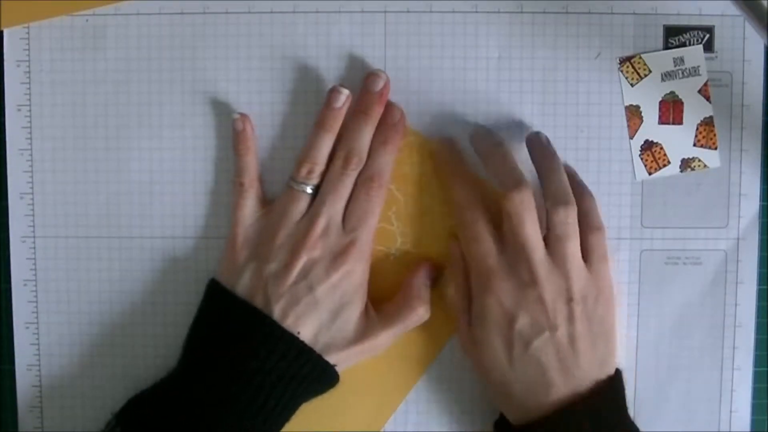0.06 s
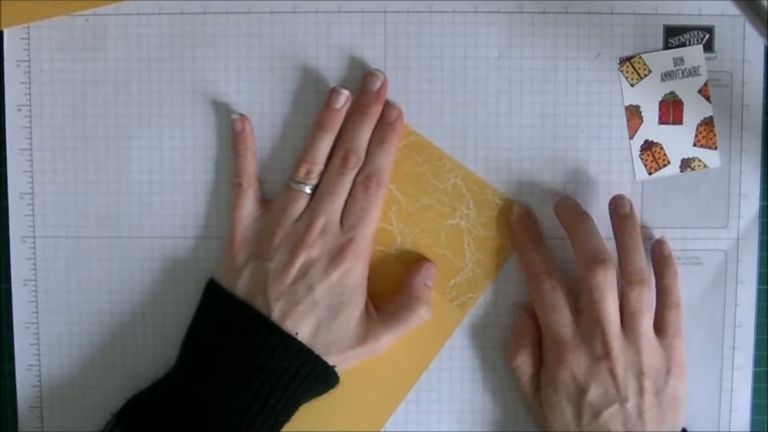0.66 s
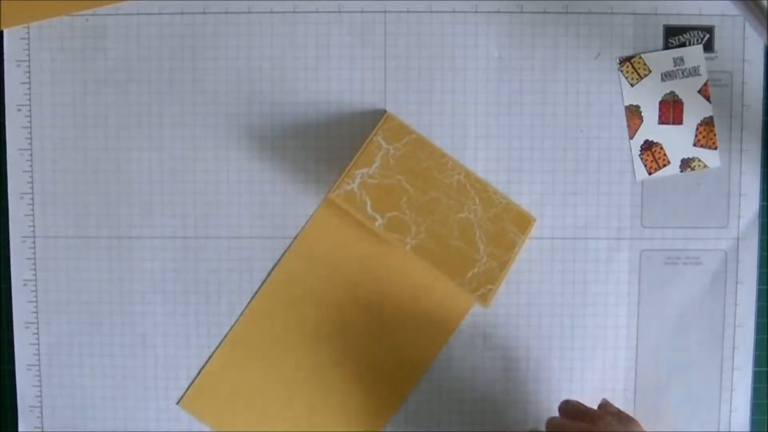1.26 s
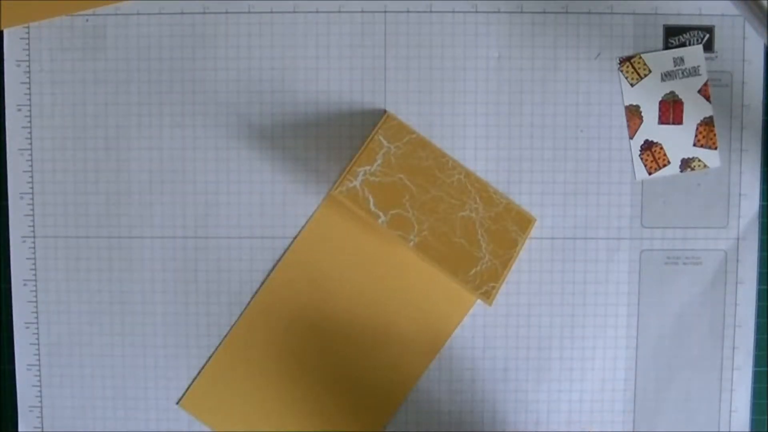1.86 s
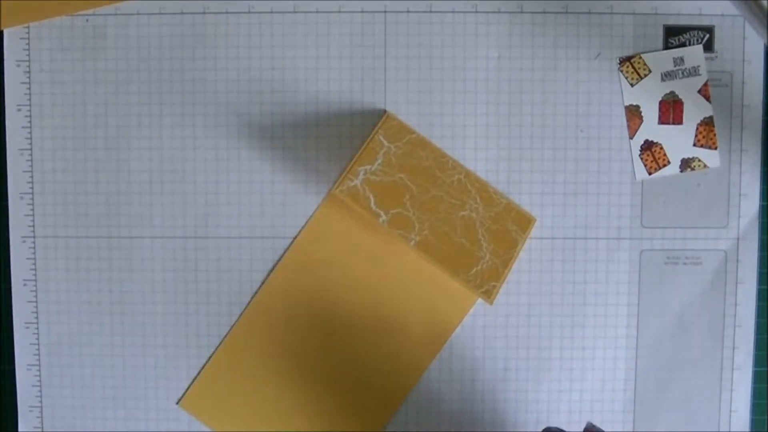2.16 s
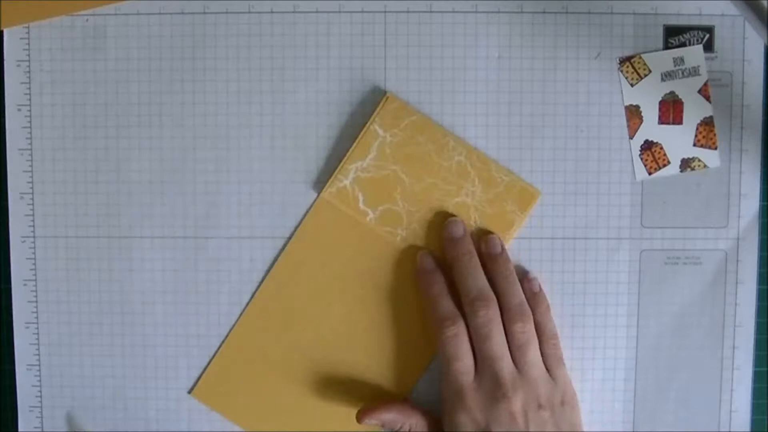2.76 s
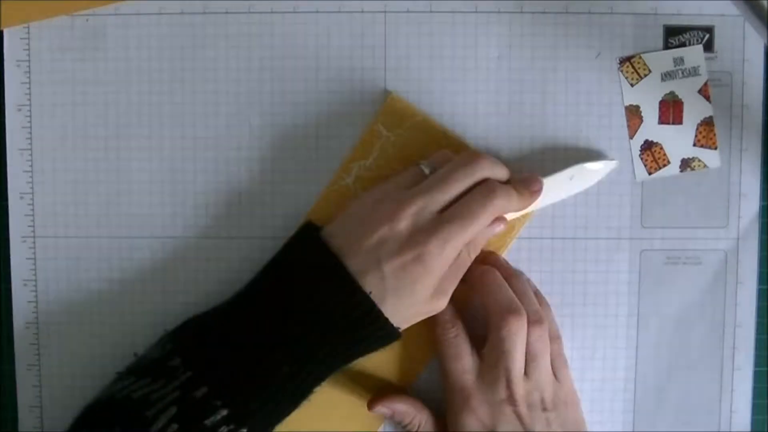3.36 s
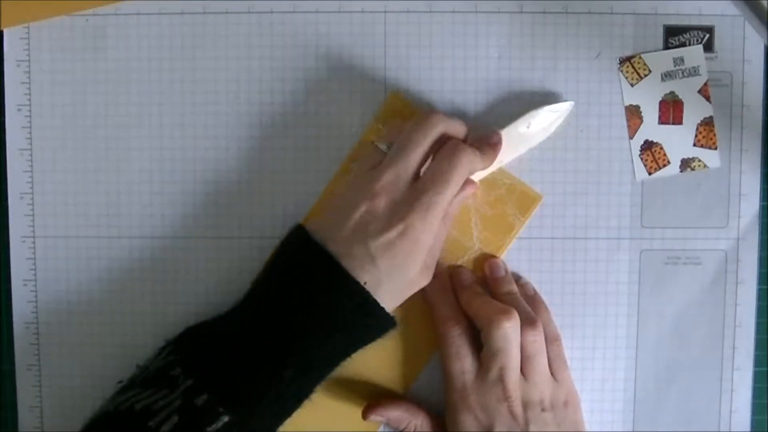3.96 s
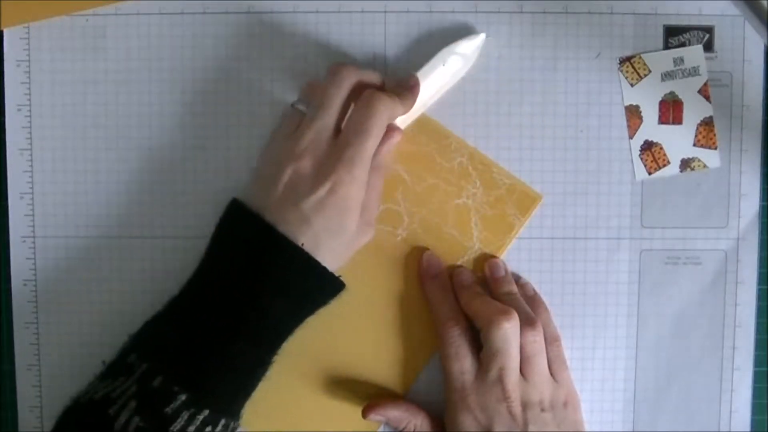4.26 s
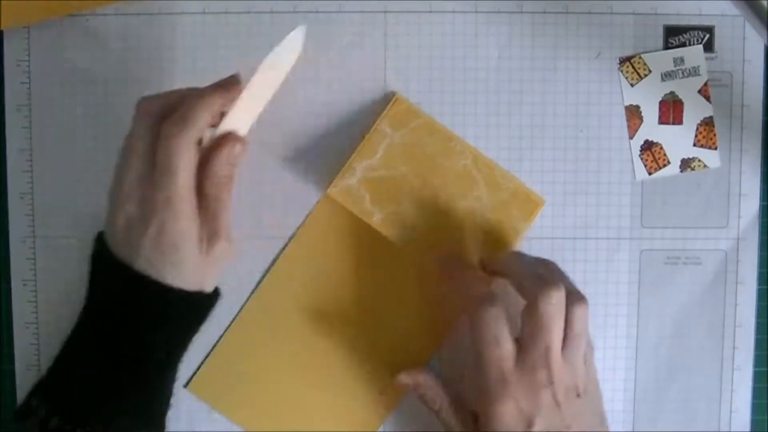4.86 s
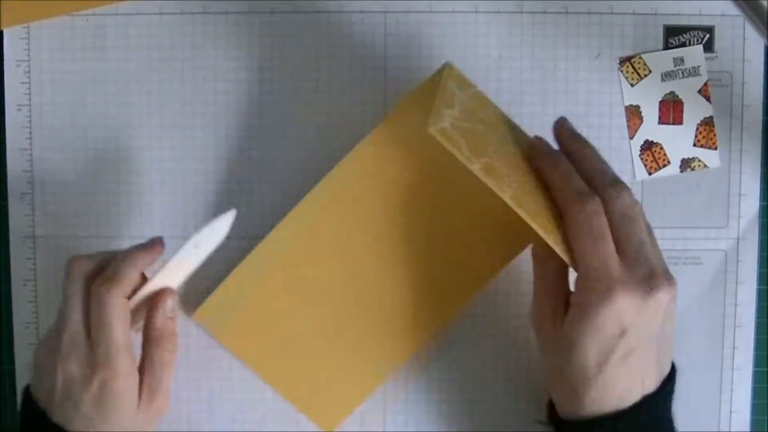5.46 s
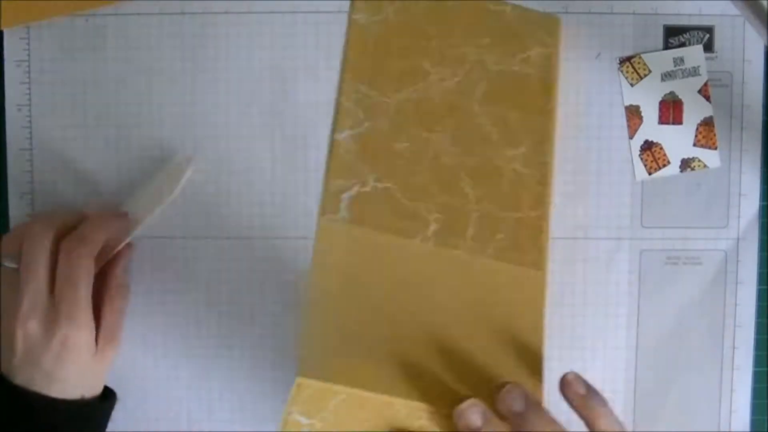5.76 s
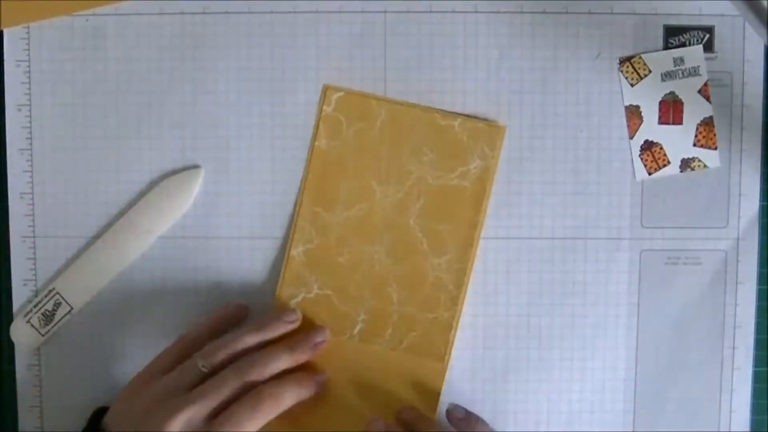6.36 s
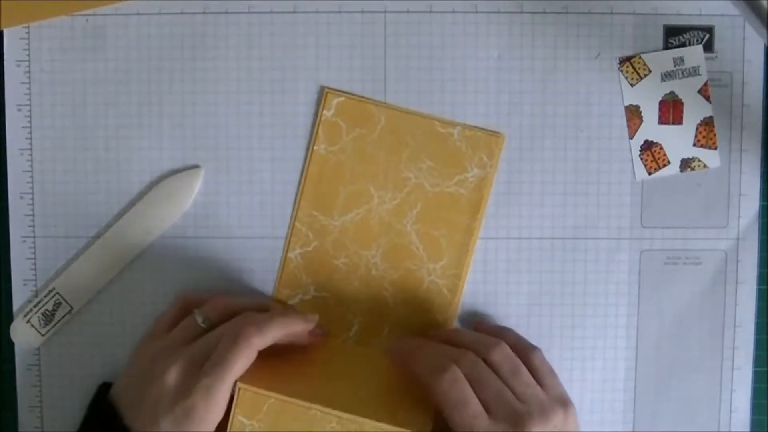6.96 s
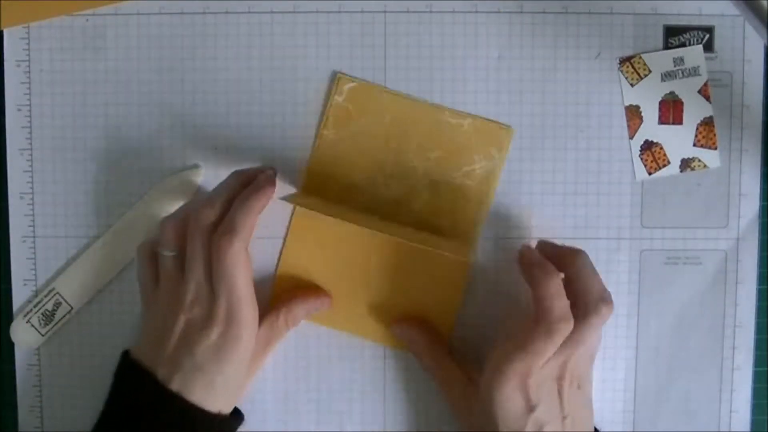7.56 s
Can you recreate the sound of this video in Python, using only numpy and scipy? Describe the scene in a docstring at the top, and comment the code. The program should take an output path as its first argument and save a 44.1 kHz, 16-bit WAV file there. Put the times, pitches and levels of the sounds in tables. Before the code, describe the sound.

Fingers slide over cardstock with a soft, dry hiss and one light tap during the first second. Around 1.5 seconds the card snaps and a hard bone folder knocks sharply with a short ring, knocking again near 1.9. Brief scuffs follow at 2.5, another knock at 3 and a snap with a soft table thump at 3.3. From about 3.5 to 4.6 the folder rubs along the crease, swelling near 4 and ending in a small snap and thump. The card swishes as it is turned, snapping at 5.7, and the tool lands with a loud clack and low thud just before 6. More sliding and edge scuffs lead to a cluster of crisp snaps and soft thumps around 7.3 to 7.5 as the card is folded again. Everything sounds close, with slight small-room reverberation over faint steady air.

```python
"""Cardstock is folded by hand on a paper-covered craft mat in a small room.
Fingers slide on the card with a friction hiss, its edges scuff, and its flap springs up with a snap.
A bone folder knocks as it is picked up, rubs along the crease and is put down; the card is turned
over and folded again. Presses ring the table's low modes as soft thumps, over steady room air."""
import sys
import numpy as np
from scipy import signal
from scipy.fft import rfft, irfft, next_fast_len
from scipy.io import wavfile
from scipy.ndimage import map_coordinates

SR = 44100
rng = np.random.default_rng(int(sys.argv[2]) if len(sys.argv) > 2 else 0)


def transcribe(signal):
    """Save signal, clipped to [-1, 1], as a 16-bit WAV file at the path in sys.argv[1]."""
    frames = np.atleast_2d(signal).T
    limited = np.clip(frames, -1, 1)
    pcm = np.round(limited * 32767).astype(np.int16)
    wavfile.write(sys.argv[1], SR, pcm)


N = 335160

# card and finger moves: peak_s, rise_s, fall_s, level_db, body_re_level_db, fizz_re_level_db, pocket_hz
CARD_SLIDES = [(0, 0.13, 0.215, -51, -15.5, -6.5, 740), (0.478, .18, 0.17, -52.5, -6.5, -2, 1000),
               (.795, 0.135, 0.11, -56.5, -11, -7.5, 1300), (1.05, 0.38, 0.17, -63.5, -15, -16, 1200),
               (1.28, 0.08, 0.033, -61, -22, -10, 1180), (2.51, 0.014, 0.08, -46.5, -15.5, -2, 1280),
               (2.62, 0.012, 0.05, -51.5, -16, -9, 1000), (3.245, 0.0071, 0.092, -50.5, -13, -12.5, 1200),
               (3.495, 0.044, 0.062, -57.5, -20, -17, 1200), (4.719, 0.035, 0.09, -50.5, -10.5, -7.5, 1790),
               (4.99, 0.27, 0.2, -58.5, -12, -24, 1200), (5.4, 0.055, 0.16, -52.5, -18, 0, 1390),
               (5.57, 0.096, 0.07, -55.5, -17, 1, 1410), (5.9, 0.3, 0.29, -58.5, -12, -8.5, 1210),
               (6.12, 0.057, 0.035, -53, -22, -12, 1600), (6.32, 0.17, 0.057, -51.5, -15, -7.5, 1408),
               (6.445, 0.081, 0.029, -50, -17, -10.5, 1210), (6.61, 0.045, 0.08, -52.5, -13, -17, 1350),
               (6.775, 0.14, 0.055, -45.5, -10, -17, 1350), (6.88, 0.044, 0.27, -59, -8, -12, 1260),
               (7.08, 0.025, 0.4, -51, -6, -5.5, 1300), (7.36, 0.15, 0.16, -51.5, -13.5, -10.5, 1360),
               (7.6, 0.069, .1, -52, -17, -5, 1200)]
# edge catches: centre_s, hiss_db, sigma_s, tone_db, tone_hz
EDGE_SCUFFS = [(0.81, -55, 0.013, -66, 4100), (1.3, -77, 0.0036, -59.5, 3200),
               (1.618, -44, 0.0044, -45.5, 3380), (1.666, -53, 0.0068, -53, 4600),
               (1.706, -42.5, 0.014, -52, 1870), (1.865, -83, 0.014, -56.5, 1120),
               (2.552, -55, 0.0041, -44, 4800), (3.278, -55, 0.007, -57, 1260),
               (4.714, -49, 0.0073, -51.5, 2230), (4.838, -53, 0.0092, -74, 4420),
               (5.432, -45, 0.0034, -52, 4500), (6.684, -45, 0.0046, -49, 2870),
               (6.761, -42, .003, -48.5, 1410), (7.203, -48, 0.011, -52.5, 1230),
               (7.271, -51, 0.0075, -46, 7850), (7.299, -46, 0.0053, -45.5, 1250),
               (7.326, -50, 0.0054, -45, 1450), (7.382, -41, 0.0049, -47, 1270),
               (7.418, -41.5, 0.0044, -42.5, 4070)]
# card snaps: start_s, level_db, low_knock_db, high_crack_db, after_ring_db, resonance_hz
CARD_SNAPS = [(1.487, -38, -23, -14, 5.5, 2060), (1.493, -30, -28, -11, -3, 3580),
              (1.603, -32, -0.5, -33, 0.5, 1460), (2.613, -35, -23, -24, -9, 3350),
              (2.860, -40.5, -29, -5.5, -3, 7800), (3.335, -38, -11.5, -5.5, 1.5, 8360),
              (4.604, -35.5, -8, -7.5, 0, 816), (5.172, -42, -13.5, -6.5, 7, 8000),
              (5.254, -36.5, -20, -9.5, 2.5, 4160), (5.7445, -26, -11.5, -1.5, -9, 4720),
              (6.355, -38.5, -1.5, -19, -5.5, 1260), (6.416, -33, -6, -23, -14, 1070),
              (7.319, -23.5, -17, -12, 4, 1400), (7.419, -23, -20, -10, -3.5, 4380),
              (7.451, -28, -14, -5.5, -14, 8270)]
# resonances of the card on the mat: centre_hz, width_hz, gain_db
CARD_MODES = [(3044, 81, 4.5), (3930, 115, 0), (4300, 72, -5), (5530, 64, 6), (7820, 99, -9)]
# folder stroke along the crease: time_s, friction_db
FOLDER_STROKE = [(3.55, -64.5), (3.612, -51), (3.682, -58), (3.824, -51), (3.946, -53.5), (4.004, -44.5),
                 (4.162, -43), (4.25, -54.5), (4.396, -51.5), (4.47, -59.5), (4.504, -72), (4.57, -55)]
# folder knocks: the columns of CARD_SNAPS, then favoured_mode_hz, modes_re_level_db
FOLDER_KNOCKS = [(1.5586, -14, -20, -17, -3.5, 4420, 5500, -31),
                 (1.877, -22.5, -12.5, -20, -0.5, 2480, 2440, -25),
                 (3.0128, -26, -13, 2, -7, 1800, 7900, -28), (5.947, -12, -16, -11, -6.5, 4500, 1700, -42)]
# modes of the folder and of a fingertip tap: pitch_hz, level_db
FOLDER_MODES = [(1700, -2), (2440, -4), (3355, -2), (4430, -17), (5500, -1.5), (7900, -1.5), (10700, -14)]
TAP_MODES = [(1437, -46), (2046, -47), (2620, -45), (2900, -43.5), (3600, -47)]
# presses and blows on the table, after a low bump at the very start: start_s, peak_db, push_centre_hz
TABLE_THUMPS = [(.002, -56.5, 85), (1.605, -58, 402), (1.882, -58.5, 222), (2.51, -56, 144),
                (2.653, -56.5, 84), (3.346, -41.5, 152), (4.604, -42.5, 340), (5.621, -53, 78.5),
                (5.754, -36.5, 200), (5.938, -39.5, 107), (5.949, -38.5, 610), (7.289, -55, 120),
                (7.421, -51, 125), (7.456, -44.5, 177)]
# table top modes: pitch_hz, level_db, t60_s
TABLE_MODES = [(79, -1, 0.23), (100, -4, 0.07), (119.6, -1.5, 0.19), (165, -5, 0.12), (248, 2, 0.072),
               (312, -0.5, 0.048), (489.5, -10, 0.083), (770, -7, 0.05)]
# spectra of card friction, folder friction, impacts and room air: freq_hz, gain_db
RUB_SPECTRUM = [(120, -51), (300, -7), (620, -15), (880, -3), (1280, -5.5), (1950, -2), (3000, -1.5),
                (4600, 5.5), (5500, -2), (6400, -8.5), (8200, -5.5), (9800, -19), (15800, -26)]
CREASE_SPECTRUM = [(100, -14), (250, -7), (550, -12.5), (900, -4.5), (2600, -4.5), (4600, 2.5), (5500, -4),
                   (6300, -12.5), (7900, -1.5), (9600, -16.5), (15800, -23.5)]
IMPACT_SPECTRUM = [(70, -60), (220, -19.5), (750, -9), (1700, -1), (2500, -1), (3500, 2.5), (4700, 4),
                   (6400, -5.5), (7400, 0), (7850, 1.5), (8600, -1), (10000, -14), (15800, -16)]
AIR_SPECTRUM = [(25, -10.5), (100, -3.5), (260, 0.5), (800, -6), (1900, -9), (4300, -10), (8000, -13.5),
                (15800, -20.5)]
# room decay: freq_hz, t60_s
ROOM_DECAY = [(100, 0.51), (2500, 0.42), (8000, 0.27), (15000, 0.14)]
# left-right likeness of friction, room tail and room air: freq_hz, correlation
RUB_CORRELATION = [(60, 0.91), (300, 0.39), (1200, 0.89), (3000, 0.97)]
TAIL_CORRELATION = [(100, 1), (300, -0.84), (900, 0.88)]
AIR_CORRELATION = [(300, -0.61), (1650, -0.37), (5000, 0.71), (15000, 1)]

SCENE_S, HIT_S = np.arange(N) / SR, np.arange(SR // 2) / SR  # time axes


def card_slides(pocket_width_hz=1700, comb_db=4.5, comb_fade_hz=4200):
    """Flat card rubs with a hollow body, tuned by the air pocket under it; a lifted edge fizzes."""
    rub = friction(RUB_SPECTRUM, catches_per_s=450, catch_db=-8, ring_db=-8, judder_db=1.43)
    body, hiss, fizz = map(unit_rms, split(rub, 1800, 9130))
    out = np.zeros((2, N))
    for peak_s, rise_s, fall_s, level_db, body_db, fizz_db, pocket_hz in CARD_SLIDES:
        envelope = amp(level_db) * swell(peak_s, rise_s, fall_s)
        on = envelope > 0
        pocket = lambda hz: 1 + amp(0.5) * resonance(hz, pocket_hz, pocket_width_hz)
        hollow = unit_rms(filtered(body[:, on], pocket))
        tilt_db_per_oct = 0.06 * (fizz_db + 9)  # a lighter touch hisses thinner
        tilt = lambda hz: amp(tilt_db_per_oct * np.log2(hz / pocket_hz + 1))
        thinned = unit_rms(filtered(hiss[:, on], tilt))
        slide = thinned + amp(body_db) * hollow + amp(fizz_db) * fizz[:, on]
        overtones = lambda hz: np.cos(2 * np.pi * (hz / pocket_hz - 0.1))
        comb = lambda hz: amp(comb_db * amp(body_db) * overtones(hz) * np.exp(-(hz / comb_fade_hz) ** 2))
        out[:, on] += envelope[on] * filtered(slide, comb)
    return amp(-1.52) * out


def edge_scuffs():
    """A catching edge drives one resonance with a brief swell of friction: low rasps, high squeaks."""
    rub = friction(RUB_SPECTRUM, catches_per_s=1000, catch_db=-2.5, ring_db=-4, judder_db=0.5)
    hiss = unit_rms(filtered(rub, lambda hz: hz > 2100))
    out = np.zeros((2, N))
    for centre_s, hiss_db, sigma_s, tone_db, tone_hz in EDGE_SCUFFS:
        on = np.abs(SCENE_S - centre_s) < 4 * sigma_s
        tone = unit_rms(filtered(rub[:, on], lambda hz: resonance(hz, tone_hz, width_hz=420)))
        envelope = np.exp(-((SCENE_S[on] - centre_s) / sigma_s) ** 2 / 2)
        out[:, on] += envelope * (amp(hiss_db) * hiss[:, on] + amp(tone_db) * tone)
    return out


def card_snaps():
    """The card snaps: the brighter the crack, the shorter the burst."""
    out = np.zeros((2, N))
    for start_s, level_db, knock_db, crack_db, ring_db, ring_hz in CARD_SNAPS:
        t60_s = 0.02 * 2 ** (-crack_db / 20)
        add(out, start_s, amp(level_db) * impact(knock_db, crack_db, ring_db, ring_hz, t60_s))
    return out


def flap_chirp(pitch_hz=4070, pulse_hz=20, level_db=-62):
    """A faint, high tone pulses unevenly while the flap rises."""
    envelope = amp(level_db) * swell(peak_s=1.23, rise_s=0.98, fall_s=0.099)
    pulses = np.maximum(np.sin(2 * np.pi * pulse_hz * SCENE_S + wobble(pulse_hz)), 0)
    return envelope * pulses * np.sin(2 * np.pi * pitch_hz * SCENE_S)


def folder_stroke():
    """The folder glides along the crease, pressing it down; the mat's drone swells less than the hiss."""
    rub = friction(CREASE_SPECTRUM, catches_per_s=700, catch_db=-6, ring_db=0, judder_db=0.55)
    drone, hiss, fizz = split(rub, 930, 14500)
    time_s, level_db = np.transpose(FOLDER_STROKE)
    gate = np.interp(SCENE_S, [time_s[0] - 0.015, time_s[0], time_s[-1], time_s[-1] + 0.04], [0, 1, 1, 0])
    friction_db = np.interp(SCENE_S, time_s, level_db)
    drone_db = -63.5 + 0.38 * (friction_db + 51)
    return gate * (amp(friction_db) * unit_rms(hiss + fizz) + amp(drone_db) * unit_rms(drone))


def folder_knocks(favour_db=8):
    """The hard folder knocks and rings on; each blow favours one mode."""
    out = np.zeros((2, N))
    for start_s, level_db, *colour, mode_hz, modes_db in FOLDER_KNOCKS:
        modes = [(hz, db + favour_db * resonance(hz, mode_hz, mode_hz / 5)) for hz, db in FOLDER_MODES]
        knock = impact(*colour, burst_t60_s=0.014) + amp(modes_db) * ringing(modes, t60_s=0.16)
        add(out, start_s, amp(level_db) * knock)
    return out


def finger_tap(start_s=0.615):
    """A fingertip gives one dry, woody tap."""
    out = np.zeros(N)
    add(out, start_s, ringing(TAP_MODES, t60_s=0.026))
    return out


def table_thumps(attack_s=0.0052):
    """A soft push rings the table's lowest modes, a hard one the higher; the mat adds a dead thud."""
    out = np.zeros(N)
    thud_floor_hz = TABLE_MODES[1][0]
    for start_s, peak_db, centre_hz in TABLE_THUMPS:
        push = lambda hz: amp(-5 * np.log2((hz + 1) / centre_hz) ** 2)
        mode_gains = amp(rng.normal(0, 1.5, len(TABLE_MODES)))
        ring = sum(gain * push(hz) * ringing([(hz, db)], t60_s)
                   for gain, (hz, db, t60_s) in zip(mode_gains, TABLE_MODES))
        thud = filtered(rng.standard_normal(len(HIT_S)), lambda hz: push(hz) ** 2 * (hz > thud_floor_hz))
        thud *= decay(t60_s=0.11)
        blow = (unit_rms(ring) + amp(-11) * unit_rms(thud)) * (1 - np.exp(-HIT_S / attack_s))
        add(out, start_s, amp(peak_db) * blow / np.abs(blow).max())
    return out


def room_tail(attack_s=0.00039):
    """The small room's impulse response; the treble dies first."""
    hz, time_s, spectra = signal.stft(rng.standard_normal((2, SR // 2)), SR, nperseg=256)
    spectra = spectra * amp(-60 * time_s / along(ROOM_DECAY, hz)[:, None])
    tail = stereo(signal.istft(spectra, SR, nperseg=256)[1], TAIL_CORRELATION)
    tail *= 1 - np.exp(-np.arange(tail.shape[1]) / SR / attack_s)
    return tail / np.linalg.norm(tail[0])


def room_air(level_db=-61):
    """Steady room air and faint hiss."""
    air = filtered(rng.standard_normal((2, N)), lambda hz: amp(along(AIR_SPECTRUM, hz)))
    return amp(level_db) * unit_rms(stereo(air, AIR_CORRELATION))


def friction(spectrum, catches_per_s, catch_db, ring_db, judder_db):
    """Paper fibres catch and let go: a dense hiss with single catches, ringing in the card."""
    catches = (rng.random((2, N)) < catches_per_s / SR) * rng.standard_normal((2, N))
    flutter = amp(judder_db * (0.88 * wobble(45) + wobble(220)))
    force = (rng.standard_normal((2, N)) + amp(catch_db) * unit_rms(catches)) * flutter
    card = lambda hz: sum(amp(db) * resonance(hz, centre, width) for centre, width, db in CARD_MODES)
    rub = filtered(force, lambda hz: amp(along(spectrum, hz)) * (1 + amp(ring_db) * card(hz)))
    return stereo(wandering(rub), RUB_CORRELATION)


def wandering(rub, depth_db=1.7):
    """The card's colour shifts as the contact travels: gain patches, narrow in pitch and slow in time."""
    spectra = signal.stft(rub, nperseg=512)[2]
    patch = np.outer(np.hanning(5), np.hanning(60))
    field = signal.fftconvolve(rng.standard_normal(spectra.shape[1:]), patch, 'same')
    return signal.istft(spectra * amp(depth_db * unit_rms(field)))[1][:, :N]


def swell(peak_s, rise_s, fall_s, speed_exponent=0.84):
    """A hand speeds up and slows in one arc; friction amplitude follows a power of its speed."""
    ramp = np.interp(SCENE_S, [peak_s - rise_s, peak_s, peak_s + fall_s], [0, 1, 0])
    return np.sin(np.pi / 2 * ramp) ** speed_exponent


def impact(knock_db, crack_db, ring_db, ring_hz, burst_t60_s):
    """A burst, then a diffuse after-ring of card and room; the contact point favours one resonance."""
    favour = lambda hz: 1 + 2 * resonance(hz, ring_hz, width_hz=220)
    colour = minimum_phase(lambda hz: amp(along(IMPACT_SPECTRUM, hz)) * favour(hz))[None]
    bands = lambda x: split(signal.fftconvolve(x, colour, axes=1)[:, :len(HIT_S)], 1620, 6270)
    burst = rng.standard_normal(len(HIT_S)) * decay(burst_t60_s) * (1 - np.exp(-HIT_S / 0.00015))
    out = np.zeros((2, len(HIT_S)))
    for band_db, hit, ring in zip([knock_db, -5, crack_db], bands(burst[None]), bands(room_tail())):
        out += amp(band_db) * (hit / np.linalg.norm(hit) + amp(ring_db) * ring / np.linalg.norm(ring[0]))
    return amp(13.5) * out


def ringing(modes, t60_s):
    """A struck object's modes as decaying sines."""
    return decay(t60_s) * sum(amp(db) * np.sin(2 * np.pi * hz * HIT_S) for hz, db in modes)


def decay(t60_s):
    return amp(-60 * HIT_S / t60_s)


def resonance(hz, centre_hz, width_hz):
    return 1 / (1 + (2 * (hz - centre_hz) / width_hz) ** 2)


def amp(db):
    return 10 ** (np.asarray(db) / 20)


def unit_rms(x):
    return x / np.sqrt(np.mean(x ** 2) + 1e-20)


def along(points, hz):
    """Interpolate (freq_hz, value) points on a log axis."""
    freq_hz, values = np.transpose(points)
    return np.interp(np.log(hz + 1), np.log(freq_hz + 1), values)


def wobble(rate_hz):
    """Smooth random curve."""
    knots = rng.standard_normal(int(N * rate_hz / SR) + 4)
    return map_coordinates(knots, [SCENE_S * rate_hz])


def filtered(x, response):
    """Zero-phase filter with gain response(hz)."""
    length = x.shape[-1]
    size = next_fast_len(length + 8192)
    return irfft(rfft(x, size) * response(np.fft.rfftfreq(size, 1 / SR)), size)[..., :length]


def minimum_phase(response, size=2048):
    """Causal impulse response with gain response(hz)."""
    cepstrum = irfft(np.log(response(np.fft.rfftfreq(size, 1 / SR))))
    cepstrum[1:size // 2] *= 2
    cepstrum[size // 2 + 1:] = 0
    return irfft(np.exp(rfft(cepstrum)))


def split(x, low_hz, high_hz):
    """Low, middle and high bands."""
    bands = [(low_hz, 'lowpass'), ([low_hz, high_hz], 'bandpass'), (high_hz, 'highpass')]
    return [signal.sosfilt(signal.butter(5, hz, kind, fs=SR, output='sos'), x) for hz, kind in bands]


def stereo(pair, correlation):
    """Mix two unrelated signals to left and right with a given correlation."""
    angle = lambda hz: np.arccos(np.clip(along(correlation, hz), -1, 1)) / 2
    mid, side = filtered(pair, lambda hz: np.array([np.cos(angle(hz)), np.sin(angle(hz))]))
    return np.array([mid + side, mid - side])


def add(track, start_s, sound):
    start = round(start_s * SR)
    track[..., start:start + sound.shape[-1]] += sound[..., :N - start]


def scene():
    """Card, folder and table close by, with a little reverb, over room air."""
    thumps, scuffs, slides = table_thumps(), edge_scuffs(), card_slides()
    direct = slides + scuffs + thumps + folder_stroke() + card_snaps()
    direct += folder_knocks() + finger_tap() + flap_chirp()
    send = amp(-9.5) * scuffs[0] + amp(-10) * slides[0] + amp(-8) * thumps
    reverb = signal.fftconvolve(send[None], room_tail(), axes=1)[:, :N]
    return direct + reverb + room_air()


def record(dry):
    """Brick-wall low-pass at 16 kHz."""
    return filtered(dry, lambda hz: hz < 16000)


dry = scene()
out = record(dry)
transcribe(out)
```